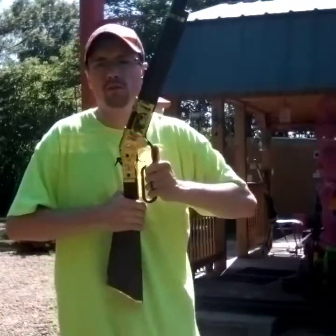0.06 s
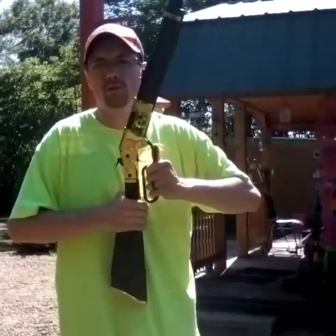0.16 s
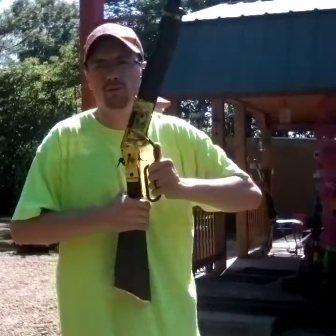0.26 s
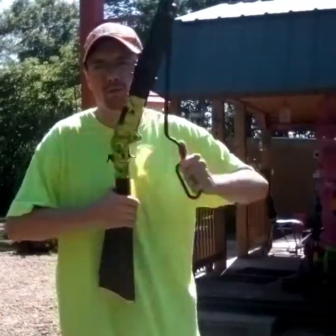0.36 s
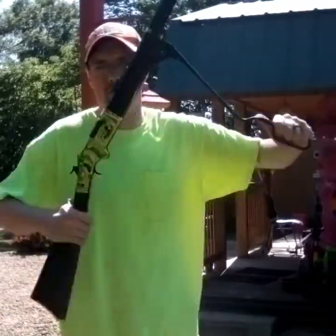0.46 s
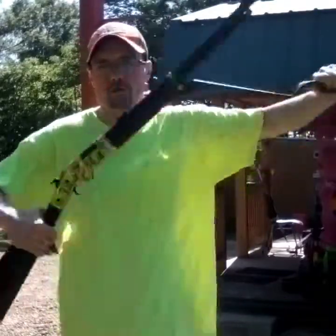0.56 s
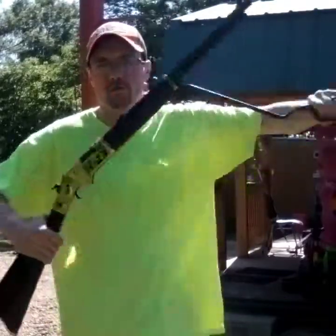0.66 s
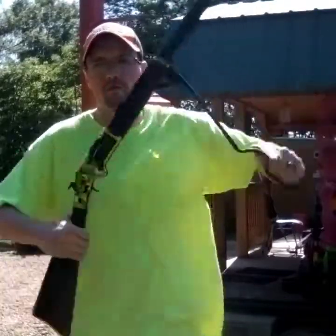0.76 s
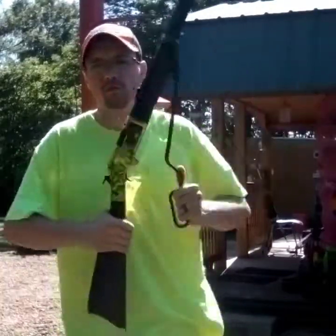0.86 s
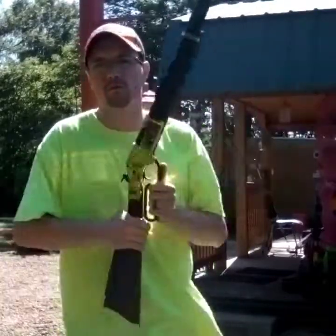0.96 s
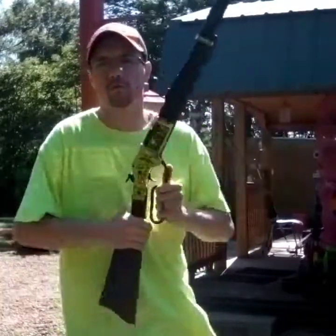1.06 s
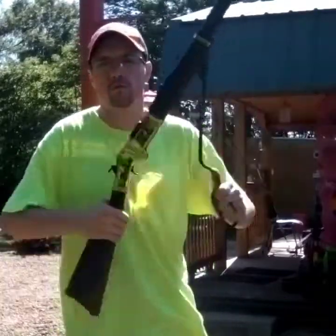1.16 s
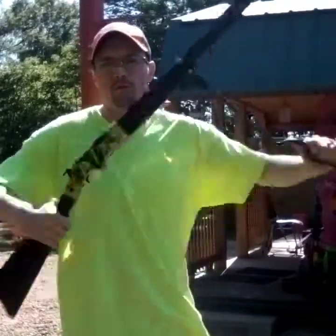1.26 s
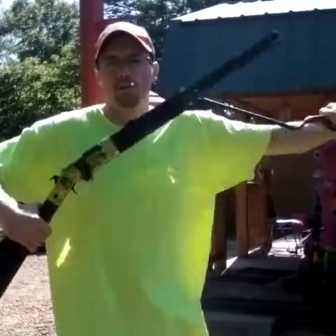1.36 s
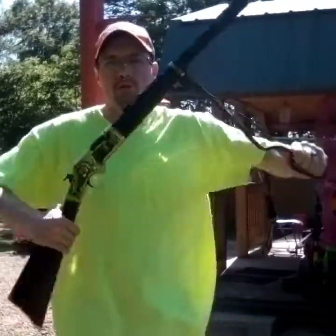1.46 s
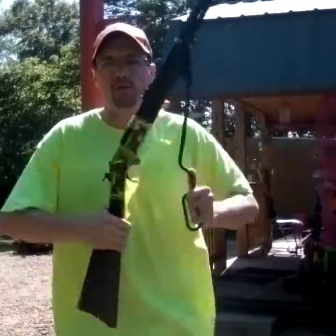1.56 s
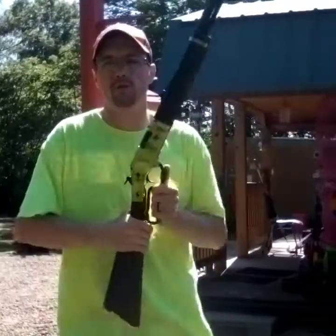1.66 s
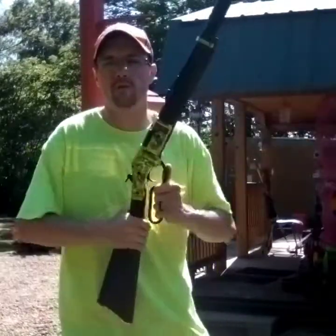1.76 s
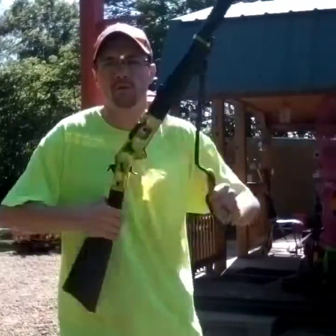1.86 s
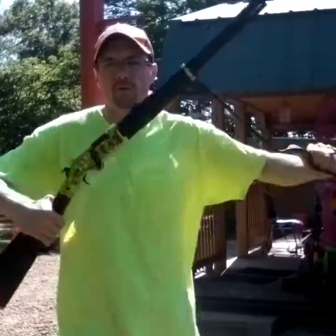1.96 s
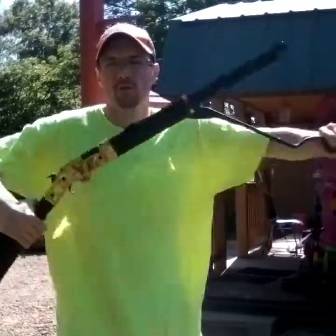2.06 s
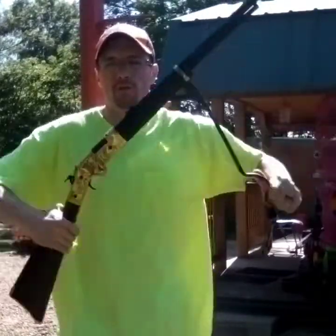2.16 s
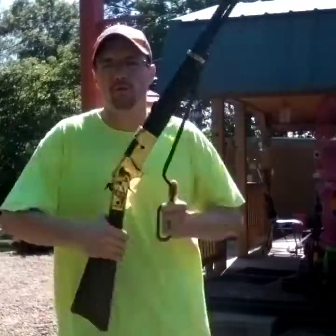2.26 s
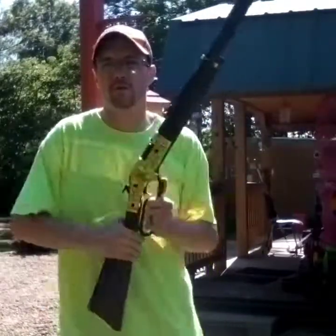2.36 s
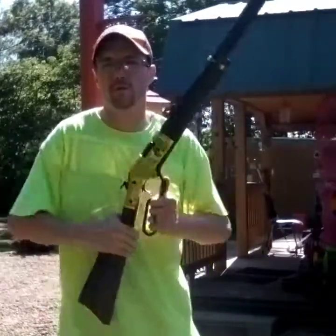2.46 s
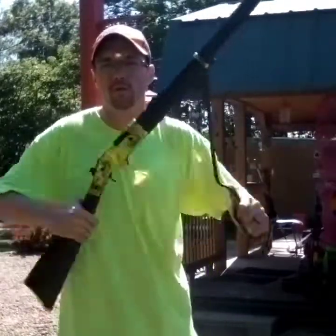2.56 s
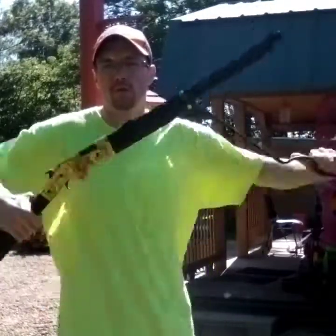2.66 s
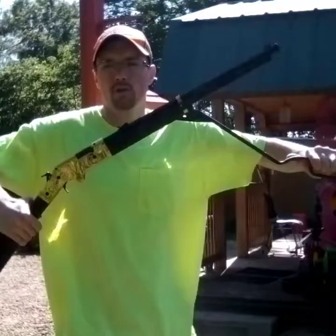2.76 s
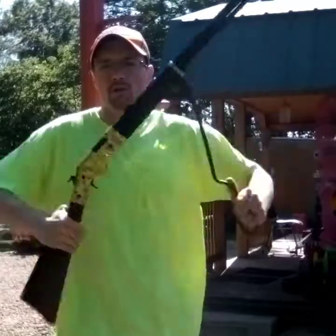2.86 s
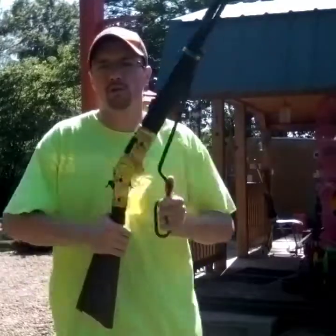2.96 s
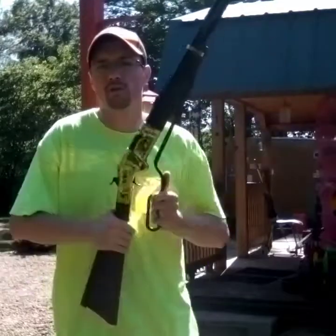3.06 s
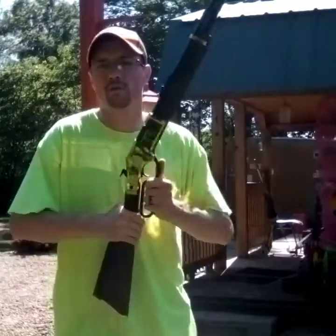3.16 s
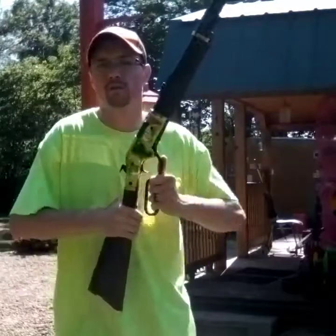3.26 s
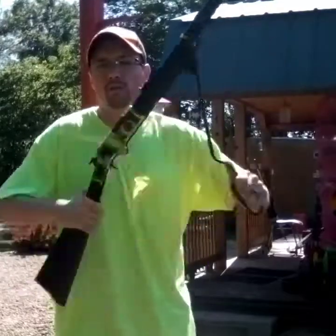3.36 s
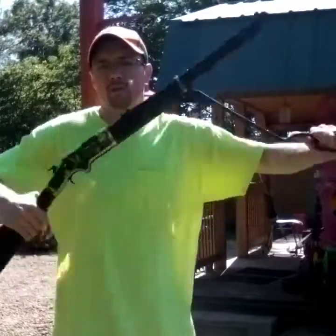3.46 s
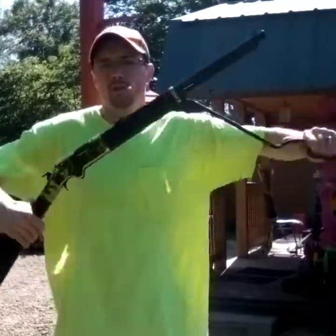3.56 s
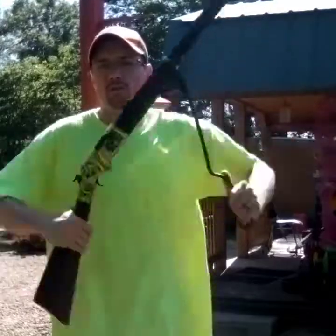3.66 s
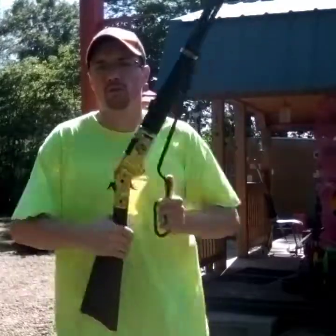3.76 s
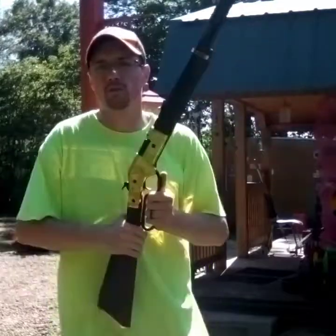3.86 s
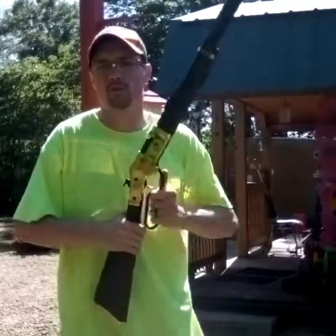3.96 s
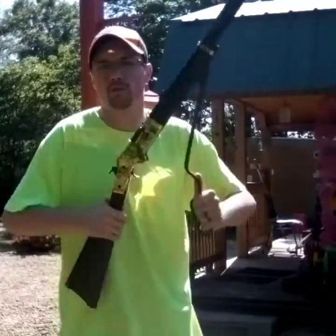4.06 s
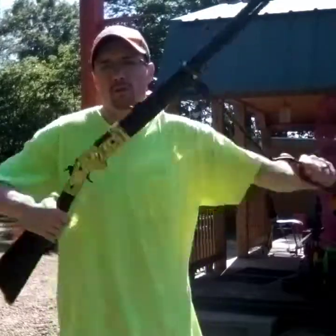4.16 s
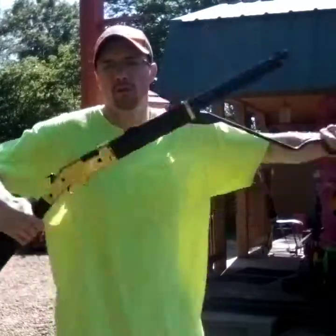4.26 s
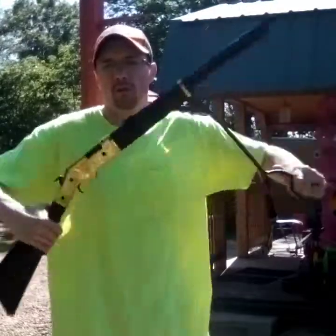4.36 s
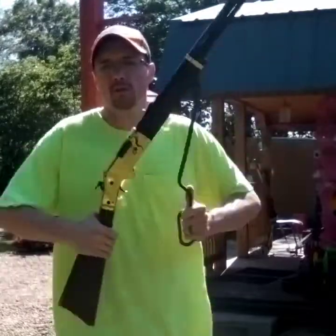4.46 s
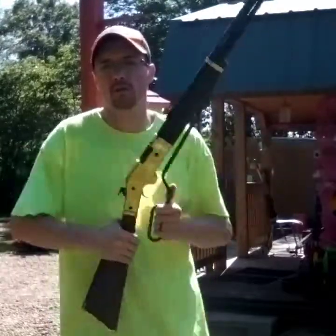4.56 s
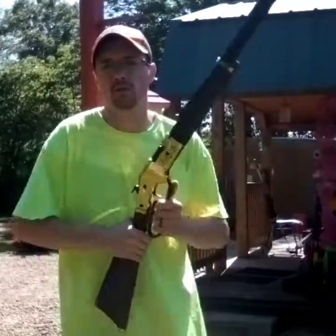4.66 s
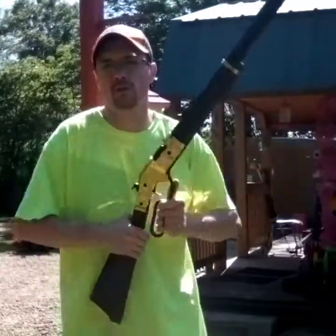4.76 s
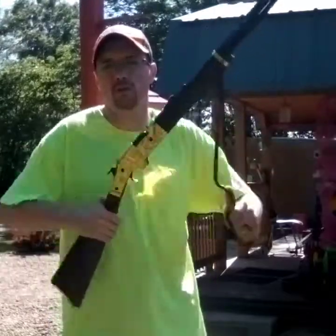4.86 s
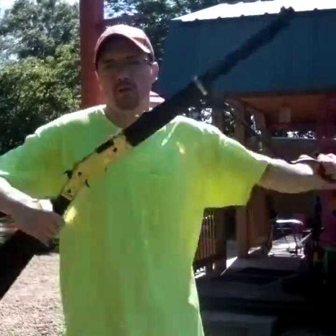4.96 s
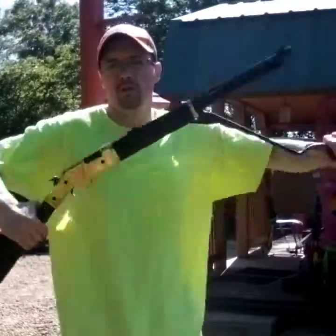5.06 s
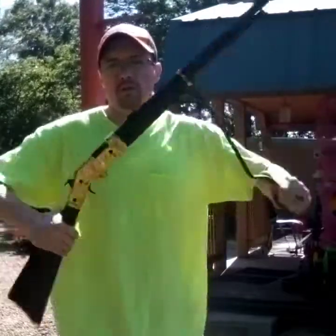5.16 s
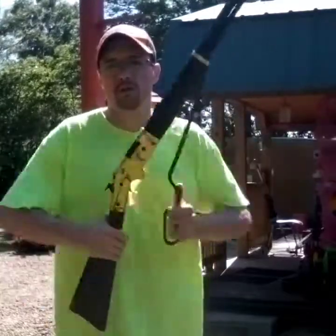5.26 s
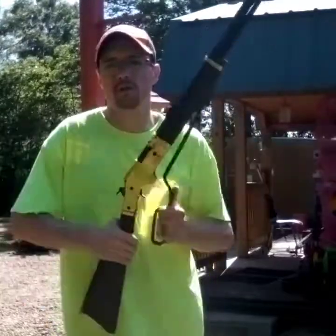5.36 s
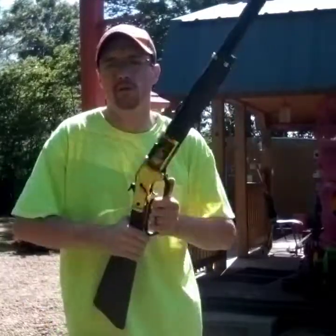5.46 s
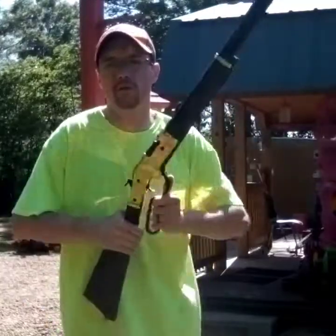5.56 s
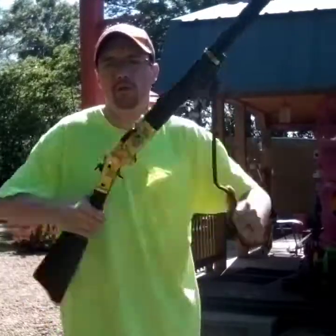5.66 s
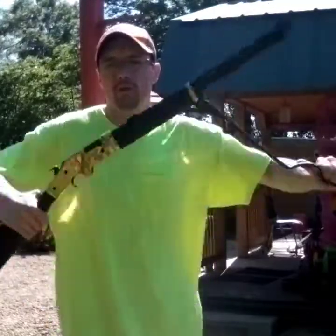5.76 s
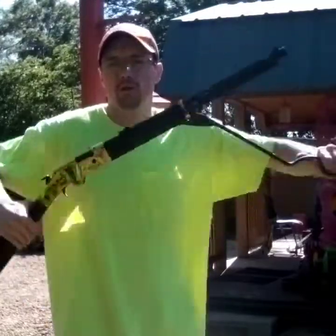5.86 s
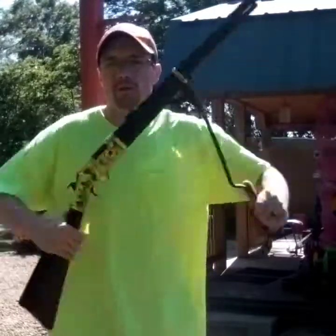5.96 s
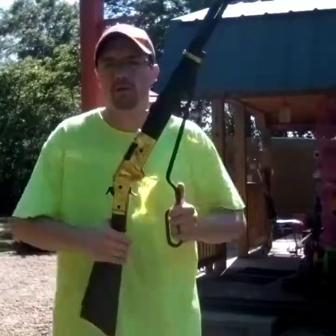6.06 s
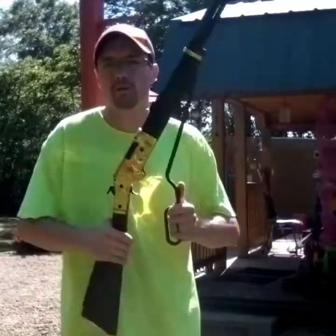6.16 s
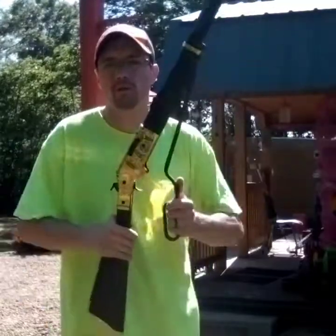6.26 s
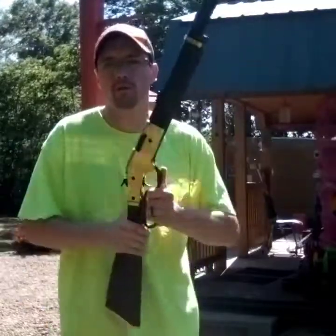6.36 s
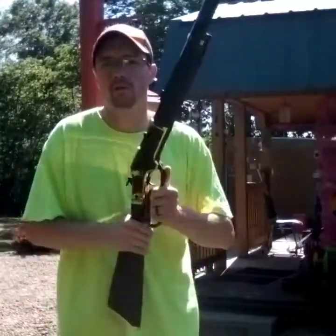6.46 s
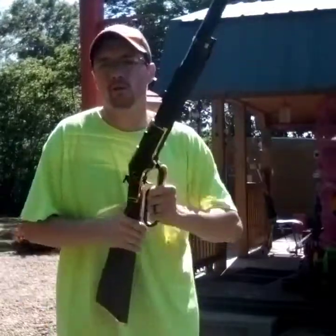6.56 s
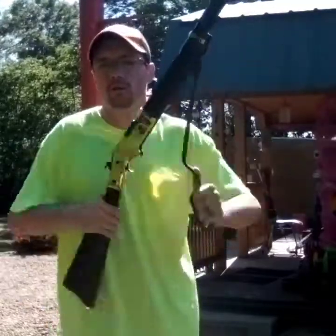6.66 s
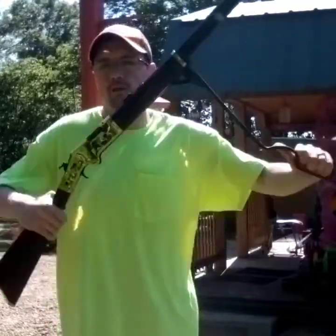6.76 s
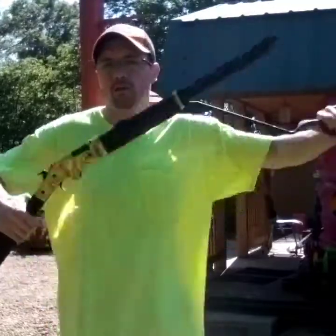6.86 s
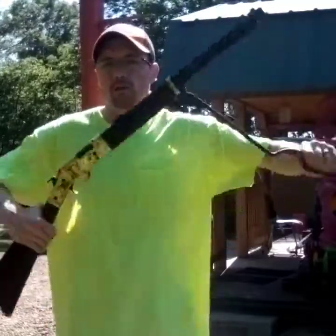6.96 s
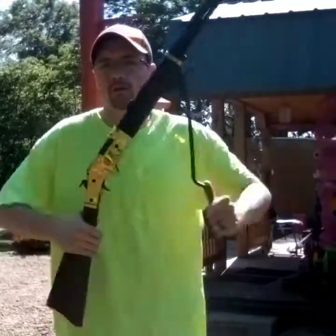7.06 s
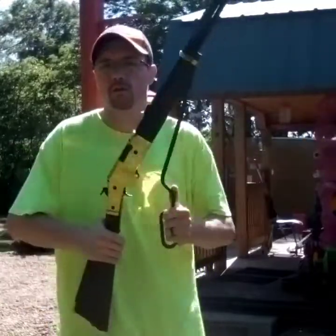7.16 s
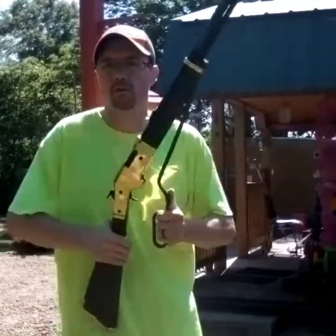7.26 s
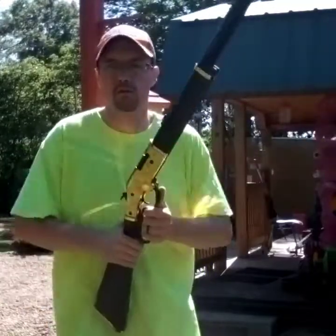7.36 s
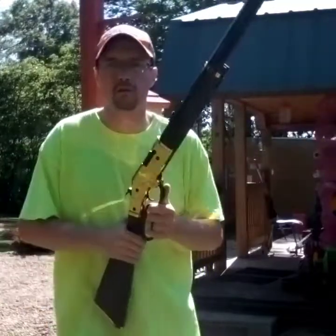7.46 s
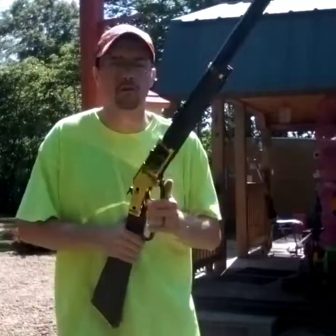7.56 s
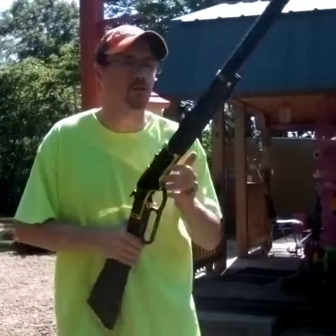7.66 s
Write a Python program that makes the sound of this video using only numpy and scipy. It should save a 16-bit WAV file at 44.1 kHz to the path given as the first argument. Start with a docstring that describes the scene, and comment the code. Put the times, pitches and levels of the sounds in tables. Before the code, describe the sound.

Close, sharp metal clacks repeat nine times as a rifle lever swings out and snaps shut, loose pellets buzzing afterward over a low distant engine hum.

```python
"""A lever-action BB rifle is cocked nine times outdoors, close to a small microphone.
Each stroke: the long lever unlatches with a knock, slides open, clicks at full swing, knocks on the
way back and slams shut. Blows are noise chatter plus ringing modes; slides are trains of slips.
Loose shot rattles as clumped noise and single hits, and the yard answers with a scattered noise tail.
A far two-tone engine, rumble and leaves lie under it all, with a thin whistle and two soft hoots."""
import sys
import numpy as np
from scipy import signal
from scipy.fft import rfft, irfft, next_fast_len
from scipy.io import wavfile
from scipy.ndimage import uniform_filter1d, map_coordinates

SR = 44100
rng = np.random.default_rng(int(sys.argv[2]) if len(sys.argv) > 2 else 0)


def wav_out(sig):
    """Save sig, one row per channel (or a flat mono array), as 16-bit PCM at SR to the path in sys.argv[1]."""
    wavfile.write(sys.argv[1], SR, np.round(np.clip(np.atleast_2d(sig).T, -1, 1) * 32767).astype(np.int16))


N = 340011  # length in samples

# One swing of the lever, out and back. Each row: unlatching in seconds, its level in dB,
# slide level in dB, catch in seconds, its level in dB, return knock in seconds, its level in dB.
STROKES = [(.4653, -32, -63, .629, -30.5, .8974, -33), (1.2441, -34.5, -57, 1.3848, -25.5, 1.6142, -32),
           (1.953, -34.5, -50, 2.0817, -28, 2.2917, -29), (2.6239, -31.5, -50, 2.7514, -25.5, 2.9687, -29),
           (3.4311, -31, -49.5, 3.5542, -26, 3.7623, -27.5),
           (4.1704, -32, -45.5, 4.2906, -25, 4.5191, -28.5),
           (4.9511, -31.5, -51.5, 5.0719, -26, 5.2934, -27.5),
           (5.7404, -33.5, -51.5, 5.8635, -28, 6.0781, -27),
           (6.7745, -32, -53.5, 6.9027, -33.5, 7.1447, -30)]
# The lever slams shut. Each row: main blow in seconds, lead of the latch in seconds, latch level in dB,
# blow level in dB, rebound delay in seconds, rebound level in dB, brightness in dB per octave,
# rattle level in dB, rattle t60 in seconds.
SLAMS = [(.9937, .0076, -6.5, -0.5, .003, -8.5, 1.25, -28, 0.52),
         (1.7054, 0.0055, -10.5, -0.5, .0025, -6.5, 1, -23.5, 0.38),
         (2.3749, 0.0068, -9.5, -2.5, .0108, -6, .8, -17, 0.29),
         (3.168, .0059, -9, -5.5, .0082, -6, 0.15, -22, 0.16),
         (3.8955, .0085, -2, -2.5, .0024, -3, 0.5, -25, 0.41),
         (4.6486, .0074, -14, -3, .0021, -1.5, 1.3, -26, .53),
         (5.4584, .0057, -5.5, 0.5, .003, -7.5, 1, -27.5, .45),
         (6.421, .008, -9.5, -3, .003, -4.5, 1.47, -27.5, 0.5),
         (7.3882, .0091, -11.5, -4.5, .003, -3, 0.6, -23, .31)]
# Modes of the lever. Each row: frequency in Hz, relative level in dB, t60 in seconds.
LEVER_MODES = [(1301, -1.5, 0.048), (1406, -6, 0.057), (1645, -4.5, 0.018), (2210, -6.5, 0.027),
               (2620, -13.5, 0.029), (3370, -11.5, 0.029), (4040, -7.5, 0.018), (5980, -18, 0.032)]
# Colours of a hard click, of gritty rubbing and of the shot. Each row: frequency in Hz, level in dB.
CLICK_COLOUR = [(300, -41.5), (800, -1.5), (1300, 1.5), (2300, 2), (3300, -3.5), (6000, -3.5),
                (16000, -18.5)]
GRIT_COLOUR = [(800, -23), (2000, -8), (4000, 0.5), (5000, 0), (6500, -2.5), (7400, 3), (10000, -7.5),
               (16000, -12.5)]
SHOT_COLOUR = [(300, -22.5), (520, -1.5), (750, -3.5), (1400, -0.5), (2300, 4.5), (3200, -1), (6500, -0.5),
               (9000, 1), (16000, -7.5)]


def amp(db):
    """Decibels to gain."""
    return 10 ** (np.asarray(db) / 20)


def unit(x):
    """Scale to rms 1."""
    return x / np.sqrt(np.mean(x ** 2) + 1e-20)


def along(points, hz):
    """Read (Hz, value) points on a log axis."""
    f, v = np.transpose(points)
    return np.interp(np.log(hz + 1), np.log(f + 1), v)


def curve(rows):
    """Read (seconds, value) rows at every sample."""
    return np.interp(np.arange(N) / SR, *np.transpose(rows))


def wobble(rate):
    """A smooth random curve, rate knots a second."""
    knots = rng.standard_normal(int(N * rate / SR) + 4)
    return map_coordinates(knots, [np.arange(N) * rate / SR])


def coloured(x, points):
    """Causal (minimum-phase) filter with the given (Hz, dB) shape."""
    m = 2 * next_fast_len(len(x) // 2 + 2048)
    cepstrum = irfft(np.log(amp(along(points, np.fft.rfftfreq(m, 1 / SR)))))
    # fold the cepstrum forward in time so that nothing sounds before the blow
    cepstrum[1:m // 2] *= 2
    cepstrum[m // 2 + 1:] = 0
    return irfft(rfft(x, m) * np.exp(rfft(cepstrum)))[:len(x)]


def noise(points):
    """Coloured noise of rms 1."""
    return unit(coloured(rng.standard_normal(N), points))


def patchy(x, depth_db):
    """Let narrow bands of a noise swell and sink on their own."""
    z = signal.stft(x, nperseg=1024)[2]
    across_bands = uniform_filter1d(rng.standard_normal(z.shape), size=5, axis=0)
    field = uniform_filter1d(across_bands, size=14, axis=1)
    return unit(signal.istft(z * amp(depth_db * unit(field)))[1][:N])


def add(track, s, x):
    """Mix x into the track at s seconds."""
    i = max(round(s * SR), 0)
    track[i:i + len(x)] += x[:max(N - i, 0)]


def strength(x):
    """Scale a blow so that its first 3 ms have rms 1."""
    return x / np.sqrt(np.mean(x[:3 * SR // 1000] ** 2) + 1e-20)


def ring(modes, scatter_db, grip_detune=.01):
    """A struck part: each blow shares its energy anew among modes that grip and lever angle shift."""
    t = np.arange(SR // 8) / SR
    hz, db, t60 = np.transpose(modes)[:, :, None]
    size, detune, sign = rng.standard_normal((3, len(modes), 1))
    pitch = hz * (1 + grip_detune * detune)
    waves = np.sign(sign) * np.sin(2 * np.pi * pitch * t)
    decay = amp(db + scatter_db * size - 60 * t / t60)
    onset = 1 - np.exp(-t / 0.00042)
    return strength(np.sum(decay * waves, 0) * onset)


def crack(points, contact, t60, ripple_db):
    """Two faces chatter while they touch; the spot that is hit decides which dense high modes ring on."""
    t = np.arange(SR // 8) / SR
    hz = np.arange(300, 16000, 220)
    ripple = ripple_db * rng.standard_normal(len(hz))
    colour = np.column_stack([hz, along(points, hz) + ripple])
    chatter = rng.standard_normal(len(t)) * amp(-60 * np.maximum(t - contact, 0) / t60)
    return strength(coloured(chatter, np.vstack([(100, points[0][1] - 6), colour])))


def background(hum_hz=100.0, throb_hz=8):
    """A far engine with two beating tones, low outdoor rumble and a hush of leaves."""
    # Engine hum and outdoor rumble over time. Each row: time in seconds, level in dB before the gain below.
    engine_level, rumble_level = [(0.0, -49.5), (0.97, -44), (1.24, -40), (2.36, -42), (3.26, -53.5),
                                  (3.71, -56), (5.84, -41), (6.94, -41.5), (7.32, -51.5), (7.71, -48.5)], [(0.0, -55.5), (3.18, -55.5), (6.96, -52.5), (7.39, -54),
                                                  (7.71, -52.5)]
    # Colours of the rumble and the leaves. Each row: frequency in Hz, level in dB.
    rumble_colour, leaf_colour = [(20, -35.5), (35, -22.5), (48, -4), (58, 2.5), (68, -1.5), (90, -4.5),
                                  (125, -1.5), (160, -3.5), (200, -9), (250, -22.5), (390, -26.5),
                                  (460, -16), (550, -7), (680, -13.5), (820, -26.5), (1100, -31.5),
                                  (2000, -54)], [(300, -19.5), (900, 1.5), (1350, 2.5), (1800, 2.5),
                                                    (3000, 1), (4500, -3.5), (5800, 3), (7000, -3),
                                                    (10000, -1.5), (13000, -2), (16000, -6)]
    hum_gain_db, rumble_gain_db, throb_db = 4.5, 9, -46
    t = np.arange(N) / SR
    turn = 2 * np.pi * hum_hz * t + wobble(4)
    beat = 2 * np.pi * throb_hz * t + 1.3 * wobble(3)
    hum = amp(curve(engine_level) + hum_gain_db) * (np.sin(turn) + amp(-25.5) * np.sin(2 * turn))
    throb = amp(throb_db) * np.sin(turn + beat)  # the second tone beats against the hum
    rumble = amp(curve(rumble_level) + rumble_gain_db) * patchy(noise(rumble_colour), depth_db=2.3)
    leaves = amp(-62.5 + 1.4 * wobble(3)) * patchy(noise(leaf_colour), depth_db=3.3)
    return hum + throb + rumble + leaves


def whistles(at_s=.114, hold_s=.17):
    """A thin, faint whistle of wavering partials swells, holds and fades."""
    # Partials of the whistle. Each row: frequency in Hz, level in dB.
    partials = [(6270, -55.5), (8861, -65), (3350, -69)]
    t = np.arange(N) / SR - at_s
    swell = np.clip(t / 0.019, 0, 1) * amp(-60 * np.maximum(t - hold_s, 0) / 0.37)
    tone = 0
    for hz, db in partials:
        tone = tone + amp(db + 2 * wobble(30)) * np.sin(2 * np.pi * hz * t + .9 * wobble(70))
    return swell * tone


def tick():
    """One brief contact of a small loose part."""
    # Colour of a small part. Each row: frequency in Hz, level in dB.
    tiny_colour = [(600, -22), (1500, 4.5), (4000, -4), (6500, -0.5), (9000, -3), (16000, -1)]
    return crack(tiny_colour, contact=.001, t60=.055, ripple_db=5)


def jiggle(count=4, faint_db=-57, spread_db=9):
    """Loose parts tick: a few clear ones, and faint ones at random while the lever swings open. The loud one at
    2.449 s is a second, lighter contact of the slam just before it."""
    # Clear ticks of loose parts, plus at 2.449 s a second light contact of the slam. # Each row: start in
    # seconds, level in dB.
    clear_ticks = [(.3591, -44.5), (.4394, -35), (.5034, -48), (1.855, -37.5), (2.3401, -35.5),
                   (2.449, -24), (2.5526, -38), (2.5905, -38), (5.6261, -43), (6.7205, -35.5),
                   (6.9341, -38), (7.1646, -40)]
    out = np.zeros(N)
    for s, db in clear_ticks:
        add(out, s, amp(db) * tick())
    for unlatch, _, _, catch, _, _, _ in STROKES:
        for share, size in rng.random((count, 2)):
            grit = crack(GRIT_COLOUR, contact=.002, t60=.05, ripple_db=6)
            add(out, unlatch + share * (catch - unlatch), amp(faint_db + spread_db * size) * grit)
    return out


def yard(x, delay=0.015, build=0.0063):
    """Porch and trees scatter a sound back as a decaying noise tail, new at each call as the rifle moves."""
    # Colour of the echo. Each row: frequency in Hz, level in dB.
    echo_colour = [(200, -1.5), (520, 0.5), (900, -1), (1600, -5.5), (2300, -2.5), (4000, 0.5), (6500, 4),
                   (10000, 9.5), (16000, -3)]
    # Decay of the echo. Each row: frequency in Hz, t60 in seconds.
    echo_decay = [(200, .4), (1000, 0.63), (2500, 0.57), (6000, 0.41), (9000, 0.27), (15000, 0.31)]
    hz, t, z = signal.stft(rng.standard_normal(2 * SR // 3), SR, nperseg=256)
    level_db = along(echo_colour, hz)[:, None] - 60 * t / along(echo_decay, hz)[:, None]
    tail = signal.istft(z * amp(level_db), SR)[1]
    tail *= np.clip((np.arange(len(tail)) / SR - delay) / build, .3, 1)  # weaker before it builds up
    return signal.fftconvolve(x, tail / np.linalg.norm(tail))


def knocks():
    """The linkage takes up its play out and back: dull taps that ring the lever, each with a faint rebound."""
    unlatch_treble_db, return_treble_db = -20, -14  # hard edge of the two knocks
    out = np.zeros(N)
    grip = 1 - np.exp(-np.arange(SR // 8) / SR / .0012)  # the hand cushions the contact
    for unlatch, unlatch_db, _, _, _, back, back_db in STROKES:
        for s, db, treble_db in [(unlatch, unlatch_db, unlatch_treble_db), (back, back_db, return_treble_db)]:
            edge = crack(CLICK_COLOUR, contact=.002, t60=.05, ripple_db=4.5)
            tap = amp(-5.5) * ring(LEVER_MODES, scatter_db=1.0) + amp(treble_db) * edge
            add(out, s, amp(db) * grip * tap)
            click = crack(CLICK_COLOUR, contact=.002, t60=.04, ripple_db=4.5)
            rebound = amp(-20) * click + amp(-15.0) * ring(LEVER_MODES, scatter_db=5.5)
            add(out, s + .003 + 0.0045 * rng.random(), amp(db) * rebound)
    return out


def scrapes():
    """The sliding linkage sticks and slips, out and back; each slip rings a shrill resonance and grit."""
    slide_from, slide_to = 0.39, .78  # share of the opening swing in which steel rubs on steel
    slide_hz, slip_s = 5980, 0.0055  # shrill resonance of the linkage, mean time between slips
    back_s, back_db, back_hz = .11, -60.5, 5800  # lighter rubbing around the return knock
    drift = 0.036  # relative spread of the shrill pitch from slide to slide
    breakaway_db, scatter_db = 6.5, 4  # boost of the first slip, random spread of the others
    out = np.zeros(N)
    t = np.arange(SR // 8) / SR
    envelope = amp(-60 * t / .045) * (1 - np.exp(-t / .001))
    for unlatch, _, slide_db, catch, _, back, _ in STROKES:
        swing = catch - unlatch
        opening = (unlatch + slide_from * swing, unlatch + slide_to * swing, slide_db, slide_hz)
        closing = (back - back_s / 2, back + back_s / 2, back_db, back_hz)
        for begin, end, db, hz in (opening, closing):
            pitch = hz * (1 + drift * rng.standard_normal())
            for k, start in enumerate(np.arange(begin, end, slip_s)):
                late, size, detune = rng.standard_normal(3)
                shrill = strength(np.sin(2 * np.pi * pitch * (1 + .025 * detune) * t) * envelope)
                grit = crack(GRIT_COLOUR, contact=.002, t60=.03, ripple_db=6)
                slip_db = db + (breakaway_db if k == 0 else scatter_db * size)
                slip = amp(-6.5) * shrill + amp(-3.5) * grit
                add(out, start + .0015 * late, amp(slip_db) * slip)
    return out


def catches():
    """The cocking catch snaps in at full swing, rings the lever, and loose parts bounce after it."""
    # Bounces after every catch. Each row: mean delay in seconds, level in dB relative to the catch.
    bounces = [(0.0126, -7.5), (.031, -13.5)]
    out = np.zeros(N)
    for _, _, _, s, db, _, _ in STROKES:
        snap = crack(CLICK_COLOUR, contact=.002, t60=.03, ripple_db=4)
        catch = amp(-6.5) * ring(LEVER_MODES, scatter_db=6.5) + amp(-5.5) * snap
        add(out, s - .001, amp(db) * catch)
        for delay, bounce_db in bounces:
            add(out, s + delay * (1 + .1 * rng.standard_normal()), amp(db + bounce_db) * tick())
    return out


def slams():
    """The lever grazes the latch, strikes it, hits the receiver and rebounds once before it seats."""
    # Modes of receiver and barrel tube. Each row: frequency in Hz, relative level in dB, t60 in seconds.
    receiver_modes = [(312, -25, 0.021), (734, -7, 0.043), (879, -14, 0.058), (1207, -4.5, 0.033),
                      (1301, -1, 0.051), (1697, -7, 0.048), (1929, -4.5, 0.037), (2251, 0, 0.029),
                      (2421, 0.5, 0.033), (2840, -11.5, 0.019), (3437, -2.5, 0.024), (3590, -5.5, 0.029),
                      (4210, -2.5, 0.016), (4874, -4, 0.029), (5520, -3.5, 0.022), (5720, -5.5, 0.014)]
    # Colour of steel on steel. Each row: frequency in Hz, level in dB.
    steel_colour = [(120, -43.5), (230, -32), (320, -17.5), (420, -20), (560, -7.5), (750, -1.5),
                    (1300, -1), (2400, -0.5), (3200, -2.5), (6000, -4), (16000, -6)]
    graze_lead_s, graze_db = .0032, -21.5  # the graze comes just before the latch
    out = np.zeros(N)
    for s, lead, latch_db, blow_db, rebound, rebound_db, brightness, _, _ in SLAMS:
        contacts = [(s - lead - graze_lead_s, graze_db), (s - lead, latch_db),
                    (s, blow_db), (s + rebound, rebound_db)]
        tilt = [(500, -2 * brightness), (8000, 2 * brightness)]  # four octaves
        for start, db in contacts:
            steel = crack(steel_colour, contact=.002, t60=.025, ripple_db=1.5)
            blow = amp(-4.0) * steel + amp(-11.0) * ring(receiver_modes, scatter_db=0.5)
            blow = amp(db) * coloured(blow, tilt)
            add(out, start, blow)
            add(out, start, amp(-20) * yard(blow))
    return out


def rattle(delay_s=0.0018, spring_db=-26):
    """After a slam the loose shot keeps buzzing in tiny clumped contacts and the spring sings faintly."""
    # Modes of the mainspring. Each row: frequency in Hz, relative level in dB, t60 in seconds.
    spring_modes = [(873, -10.5, .25), (12420, -17, .3)]
    out = np.zeros(N)
    t = np.arange(2 * SR // 3) / SR
    knots = t[::SR // 350]
    for s, _, _, blow_db, *_, db, t60 in SLAMS:
        clumps = np.interp(t, knots, rng.standard_normal(len(knots)))
        buzz = unit(coloured(rng.standard_normal(len(t)) * amp(3.5 * clumps), SHOT_COLOUR))
        dull = coloured(buzz, [(6500, -1.5), (9500, -11)])
        buzz = dull + (buzz - dull) * np.exp(-t / 0.18)  # gentler contacts lose their treble
        spring = 0
        for hz, level, decay in spring_modes:
            fade = amp(level + rng.normal(0, 4.8) - 60 * t / decay)
            spring = spring + fade * np.sin(2 * np.pi * hz * t)
        add(out, s + delay_s, amp(db - 60 * t / t60) * buzz * np.clip(t / .02, 0, 1))
        add(out, s, amp(blow_db + spring_db) * spring)  # in proportion to the blow
    return out


def pellets(count=10, relative_db=-3, scatter_db=2.5):
    """Single pellets strike the tube and stand out of the buzz, on the whole more weakly as the shot settles."""
    out = np.zeros(N)
    for s, *_, db, t60 in SLAMS:
        for share, size in zip(rng.uniform(.05, .5, count), rng.standard_normal(count)):
            hit = crack(SHOT_COLOUR, contact=.001, t60=.025, ripple_db=5)
            hit_db = db + relative_db + scatter_db * size - 60 * share
            add(out, s + share * t60, amp(hit_db) * hit)
    return out


def hoots():
    """Brief soft hollow tones, plain sines, swell and fade in the background."""
    # Each row: time of the peak in seconds, frequency in Hz, level in dB.
    hoot_tones = [(1.158, 570, -34.5), (3.331, 568, -34.5)]
    t = np.arange(N) / SR
    return sum(amp(db) * np.exp(-((t - s) / 0.0087) ** 2) * np.sin(2 * np.pi * hz * t)
               for s, hz, db in hoot_tones)


def scene():
    """The rifle, its echo and the outdoor background."""
    handling = knocks() + catches() + scrapes() + jiggle()
    echo = amp(-16.5) * yard(handling)[:N]  # the slams bring their own echo
    rifle = slams() + rattle() + pellets() + handling + echo
    return (rifle + whistles() + hoots() + background())[None]


def record(dry, top_hz=16400):
    """A small microphone, dull above 7 kHz, that overloads on the hardest blows; nothing passes top_hz."""
    # Response of the microphone. Each row: frequency in Hz, level in dB.
    response = [(6400, -0.5), (7200, -6), (8200, -16.5), (10000, -21.5), (12000, -27), (13800, -26.5),
                (14900, -15), (15400, -17.5), (15900, -47)]
    x = coloured(dry[0], response)
    x = x / (1 + np.abs(x) ** 6) ** (1 / 6)  # soft overload
    m = next_fast_len(N + SR // 4)
    passed = np.fft.rfftfreq(m, 1 / SR) < top_hz
    return irfft(rfft(x, m) * passed, m)[None, :N]


dry = scene()
out = record(dry)
wav_out(out)
```